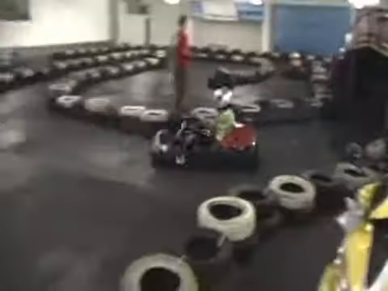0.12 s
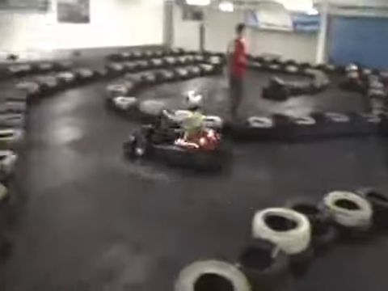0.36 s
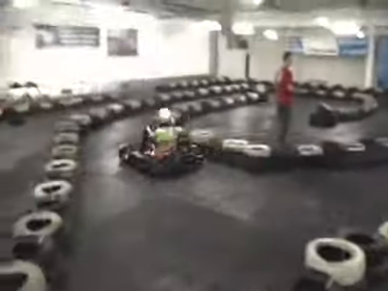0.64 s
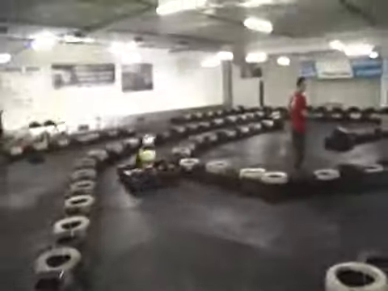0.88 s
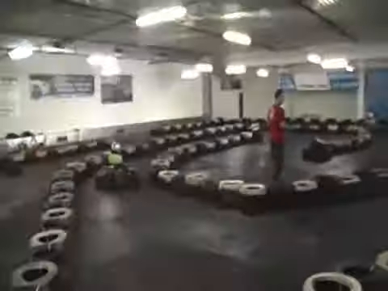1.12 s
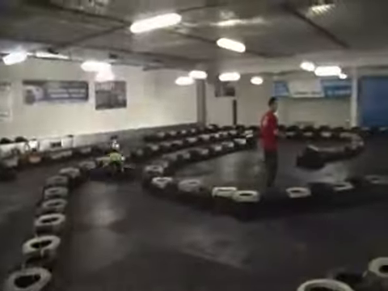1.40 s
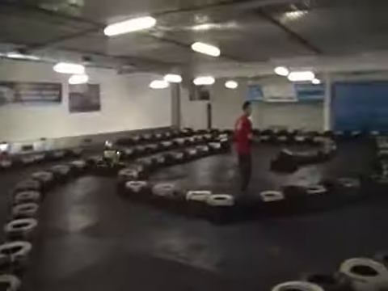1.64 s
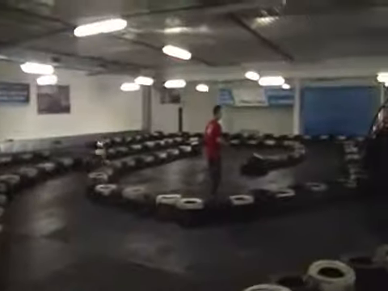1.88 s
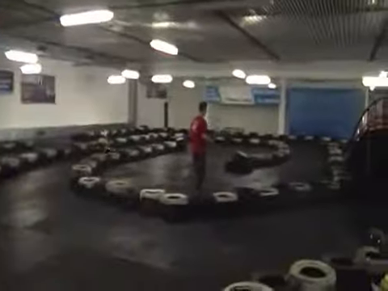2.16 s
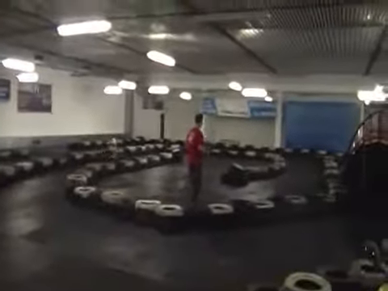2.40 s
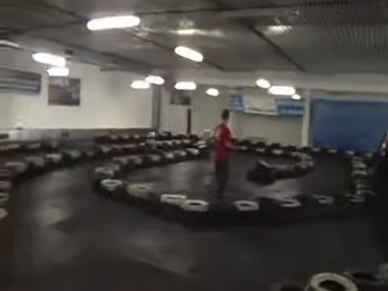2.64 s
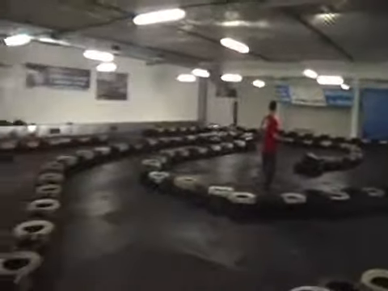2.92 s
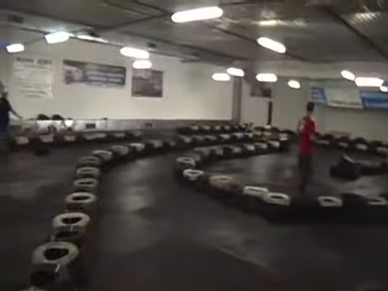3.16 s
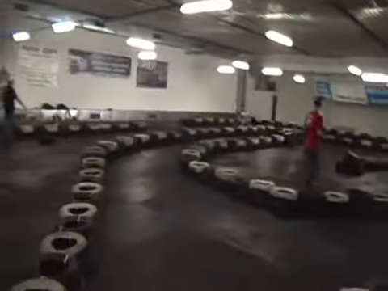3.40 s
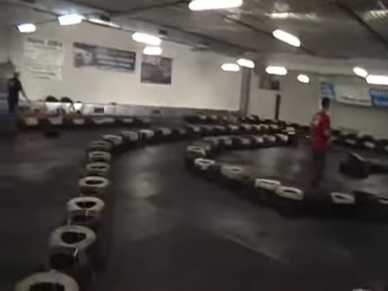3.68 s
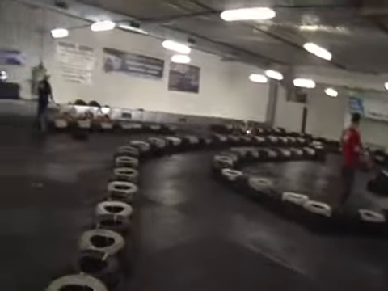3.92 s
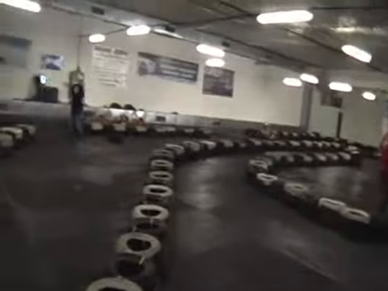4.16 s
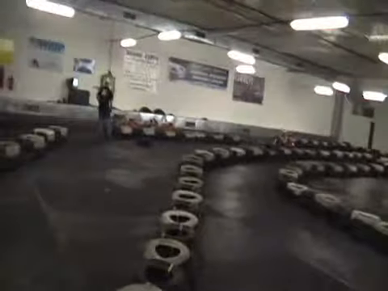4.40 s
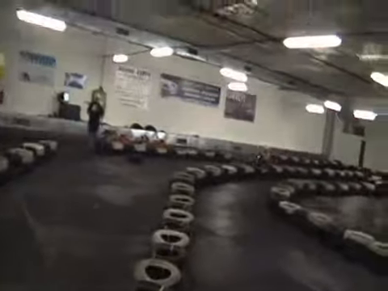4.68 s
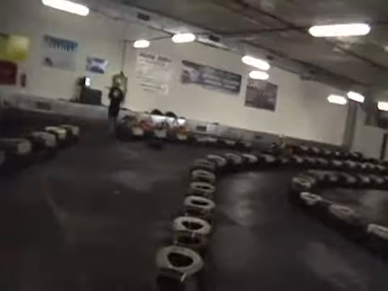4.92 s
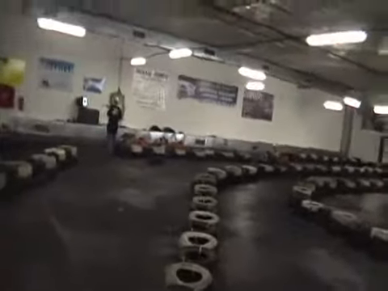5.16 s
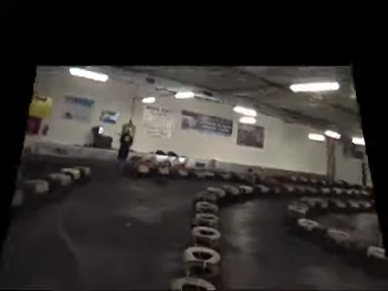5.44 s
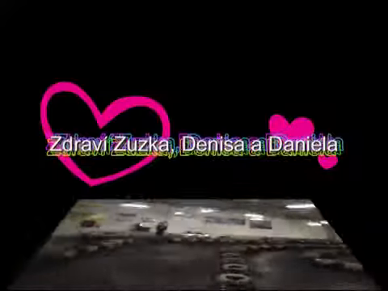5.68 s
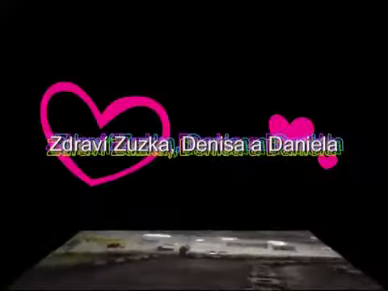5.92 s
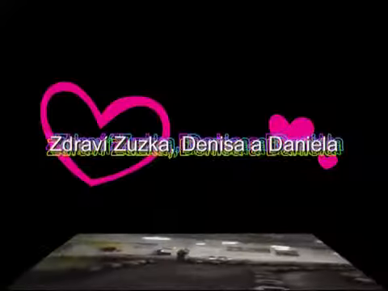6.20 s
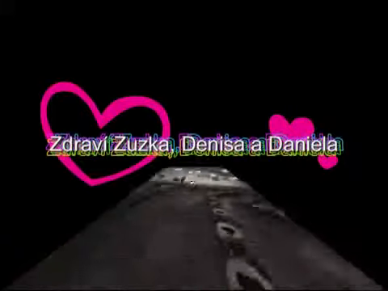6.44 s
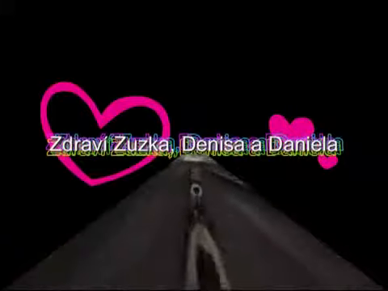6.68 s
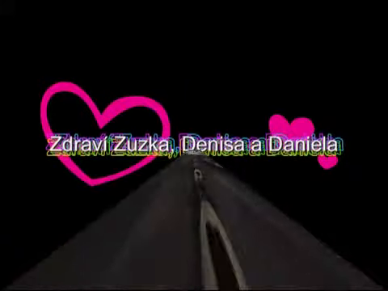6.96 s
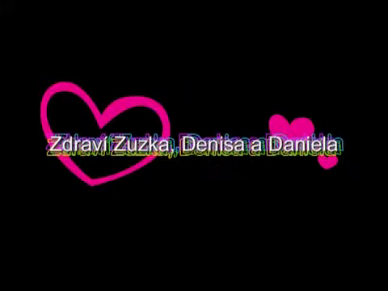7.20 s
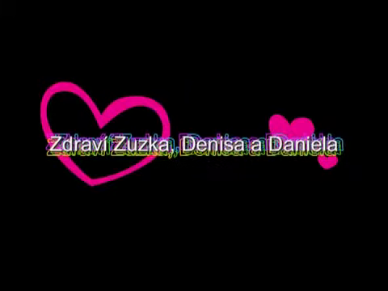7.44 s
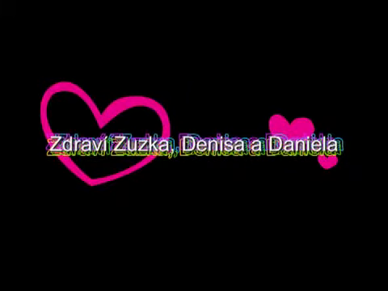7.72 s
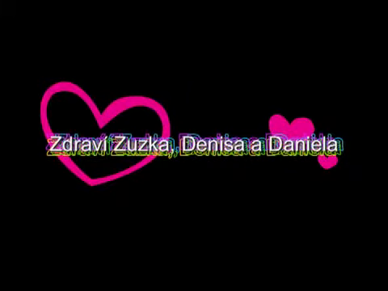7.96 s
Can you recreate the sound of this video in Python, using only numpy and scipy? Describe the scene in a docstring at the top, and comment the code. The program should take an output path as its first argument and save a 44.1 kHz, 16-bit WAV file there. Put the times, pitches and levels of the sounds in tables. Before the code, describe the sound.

A continuous noisy roar of kart engines fills an indoor track: low exhaust rumble, metallic rattle and rough hiss, pulsing with rapid firing. Low buzzing notes from different karts stand out in turn. Midway the tyres screech in wavering tones, while the engine roar dips and then returns. A straight fade carries it all away, with one last faint squeal, in a slightly wide, trackside stereo pickup.

```python
"""First comes a dense roar in a low concrete hall, with the exhaust notes of lapping karts standing out of it.
The roar is shaped noise and the single-cylinder four-stroke notes are combs of firing orders.
From 3.2 s tyres squeal through the corners: unsteady stick-slip tones with a tail of the hall.
Two close microphone ports take it all in; a straight fade ends in silence."""
import sys
import numpy as np
from scipy import signal
from scipy.fft import rfft, irfft
from scipy.io import wavfile
from scipy.ndimage import uniform_filter1d

SR = 44100
rng = np.random.default_rng(int(sys.argv[2]) if len(sys.argv) > 2 else 0)


def level_to_linear(level):
    """Convert decibel levels to linear amplitude factors, elementwise."""
    exponent = np.asarray(level, float) / 20
    return 10 ** exponent


def unload_audio(sound):
    """Save the sound as a 16-bit wav file, at the path given as the first command line argument."""
    columns = np.transpose(np.atleast_2d(sound))
    # keep every value between -1 and 1, then stretch to whole-number steps
    steps = np.round(np.clip(columns, -1, 1) * 32767)
    wavfile.write(sys.argv[1], SR, steps.astype(np.int16))


N = 356315
T = np.arange(N) / SR  # s


def evened(x):
    """Scales a signal to rms 1."""
    return x / np.sqrt(np.mean(x ** 2) + 1e-20)


def read(points, hz):
    """Reads a table over frequency at the given frequencies, on a logarithmic scale of pitch."""
    f, value = np.transpose(points)
    return np.interp(np.log(hz + 1), np.log(f + 1), value)


def columns(rows, t):
    """Reads every column of a table over time at the times t."""
    s, *values = np.transpose(rows)
    return [np.interp(t, s, v) for v in values]


def hump(x, middle, length):
    """A smooth rise and fall of height 1."""
    return np.exp(-4 * ((x - middle) / length) ** 2)


def wander(count, hz):
    """Smooth chance of rms 1 that changes up to about hz times a second."""
    b, a = signal.butter(2, min(hz, 9000), fs=SR)
    return evened(signal.lfilter(b, a, rng.standard_normal(count)))


def coloured(points, patchy_db):
    """Noise of a given spectrum with drifting louder and softer patches, at rms 1."""
    hz = np.fft.rfftfreq(2048, 1 / SR)
    real, imaginary, chance = rng.standard_normal((N // 512 + 5, 1025, 3)).T
    smooth = uniform_filter1d(chance, size=16, axis=0)  # over frequency
    patches = evened(uniform_filter1d(smooth, size=8, axis=1))  # over time
    outside = (hz < points[0][0]) | (hz > points[-1][0])
    shape_db = np.where(outside, -120, read(points, hz))
    spectra = (real + 1j * imaginary) * level_to_linear(shape_db[:, None] + patchy_db * patches)
    return evened(signal.istft(spectra, nperseg=2048, noverlap=1536)[1][:N])


def ringing(modes):
    """Noise ringing in a few resonances."""
    sound = 0
    for hz, width, db in modes:
        b, a = signal.iirpeak(hz, hz / width, SR)
        sound = sound + level_to_linear(db) * evened(signal.lfilter(b, a, rng.standard_normal(N)))
    return sound


# low exhaust rumble across the hall: (frequency [Hz], relative density [dB per Hz])
RUMBLE_SPECTRUM = [(15, -40.5), (25, -10.5), (70, -10), (110, -6.5), (214, -1.5), (353, -7), (415, -1.5),
                   (604, -7.5), (834, -5.5), (1350, -14.5), (1800, -16), (2340, -49), (3960, -120)]


def rumble(level_db):
    """Many exhausts smeared by the hall into low, patchy noise."""
    return level_to_linear(level_db) * coloured(RUMBLE_SPECTRUM, patchy_db=1.4)


# engine clatter across the hall: (frequency [Hz], relative density [dB per Hz])
CLATTER_SPECTRUM = [(530, -5.5), (900, -2.5), (1370, -4), (2300, -2), (2650, -3), (3130, -3), (6000, -10),
                    (7800, -32.5), (13200, -120)]
# a casing that rings in the clatter: (frequency [Hz], width [Hz], level over the clatter [dB])
CASING_MODES = [(2642, 110, -10)]
# silencer of the nearest kart: (frequency [Hz], width [Hz], relative level [dB])
SILENCER_MODES = [(581.5, 52, 0), (1128, 33, -4)]
# that silencer rings out: (middle [s], length [s], level [dB])
SILENCER_SWELLS = [(.7, 1.0, -25.5), (1.6, 0.74, -25), (3.85, 0.91, -28), (5.2, 0.32, -31)]


def clatter(level_db, puff):
    """Casings and chains as noise, with the silencer's resonances; the firings puff through both."""
    engines = level_to_linear(level_db) * (coloured(CLATTER_SPECTRUM, patchy_db=0.63) + ringing(CASING_MODES))
    silencer_level = sum(level_to_linear(db) * hump(T, middle, length) for middle, length, db in SILENCER_SWELLS)
    return (engines + silencer_level * ringing(SILENCER_MODES)) * evened(1 + 0.51 * puff)


# main part of the hiss: (frequency [Hz], relative density [dB per Hz])
HISS_SPECTRUM = [(2350, -25), (4000, -7), (5100, -0.5), (6750, -1.5), (9000, -10), (9800, -33.5),
                 (12000, -62)]
# part of the hiss that lies mostly above 9 kHz: (frequency [Hz], relative density [dB per Hz])
HIGH_HISS_SPECTRUM = [(8500, -14), (9300, 3), (10600, 0.5), (11800, -16.5), (12200, -30.5)]


def hiss(level_db, high_db, puff):
    """Treble noise with a separate part above 9 kHz, both swelling at every firing puff."""
    body = level_to_linear(level_db) * coloured(HISS_SPECTRUM, patchy_db=1.3)
    high = level_to_linear(high_db) * coloured(HIGH_HISS_SPECTRUM, patchy_db=3.0)
    return (body + high) * evened(1 + puff)


# roar in the hall:
# (time [s], exhaust rumble [dB], engine clatter [dB], hiss [dB], level of the hiss above 9 kHz [dB])
ROAR_LEVELS = [(0, -18, -19.5, -25, -44), (.42, -19, -18.5, -22, -35.5), (.9, -21.5, -20.5, -23, -36.5),
               (.97, -22, -21, -27, -48.5), (1.3, -18, -18.5, -24.5, -44.5), (1.37, -19, -16.5, -21, -33),
               (1.55, -19.5, -19.5, -22.5, -38.5), (1.77, -17, -17.5, -20.5, -35.5),
               (1.86, -20, -20.5, -25, -46.5), (2.4, -18.5, -19.5, -23, -37.5), (2.7, -20, -20, -25, -39),
               (3.3, -18, -19.5, -23.5, -39.5), (3.6, -19, -21.5, -26, -65), (4.05, -22, -17, -28, -61.5),
               (4.21, -25, -23, -23, -62), (4.57, -26, -26.5, -32.5, -69), (4.83, -23.5, -27, -33, -55.5),
               (5.1, -21, -20, -26, -49), (5.43, -17.5, -19.5, -26, -50), (6.1, -17, -18.5, -24.5, -44.5),
               (6.6, -19.5, -19.5, -22.5, -41), (7.3, -20, -19.5, -25.5, -36.5)]
# firing puffs of the nearest kart: (time [s], depth in the hiss before evening [share])
PUFF_DEPTH = [(0, 0.63), (1.8, 0.23), (2.2, 0.16), (7, 0.24)]


def roar(turns):
    """Rumble, clatter and hiss together; the nearest kart's firings puff through the clatter and hiss."""
    rumble_db, clatter_db, hiss_db, high_hiss_db = columns(ROAR_LEVELS, T)
    depth, = columns(PUFF_DEPTH, T)
    puff = depth * np.exp(-(turns % 1) / 0.2)  # dies away over a fifth of the firing interval
    flicker = level_to_linear(0.5 * wander(N, hz=14))  # the whole roar flickers by 0.5 dB rms
    return flicker * (rumble(rumble_db) + clatter(clatter_db, puff) + hiss(hiss_db, high_hiss_db, puff))


def hall(x, t60):
    """A dense tail of noise, from 15 ms on, that falls 60 dB in t60 seconds."""
    t = np.arange(SR) / SR
    tail = rng.standard_normal(SR) * level_to_linear(-60 * t / t60) * (t > .015)
    return signal.fftconvolve(x, tail / np.linalg.norm(tail))[:N]


# one table for each squeal: (time [s], slip rate [Hz], level before overtones and band filter [dB],
# overtones over that level [dB], unsteadiness of the rate [share, rms])
TYRE_SQUEALS = [
    [(3.2, 3175, -28.5, -15.5, 0.098), (3.3, 3210, -21.5, -14, .12), (3.5, 3160, -22.5, -21, .14),
     (3.72, 2767, -22, -4, 0.14), (3.87, 2624, -21, -5, 0.092), (4.03, 2890, -21, 1, 0.085),
     (4.1, 2823, -21, -3.5, 0.063), (4.17, 2800, -28.5, -4, .07)],
    [(4.05, 2150, -33, -6.5, .044), (4.09, 2163, -17, -9.5, .045), (4.145, 2180, -16.5, -3, 0.055),
     (4.21, 2070, -17.5, -3, .05), (4.39, 1950, -13, -6, .075), (4.47, 2002, -16.5, -4.5, .08),
     (4.59, 2027, -15, -6.5, 0.098), (4.63, 2060, -17, -9.5, .12), (4.75, 2015, -18.5, -7, .12),
     (4.95, 2063, -20.5, -9, .12), (5.05, 2064, -26, -13, .12), (5.22, 2017, -21.5, -12.5, .12),
     (5.4, 2010, -30, -8.5, .1)],
    [(4.6, 3150, -25.5, -30.5, .053), (5, 3090, -30.5, -26, 0.062)],
    [(6.5, 2600, -30, -3, .04), (6.57, 2740, -21.5, -4, .03), (6.63, 2560, -21.5, -5, .05),
     (6.71, 2610, -22, -8, .045), (6.73, 2280, -21.5, -5, .03), (6.85, 2400, -24, -13, .06),
     (6.89, 2484, -29, -8, 0.066), (7, 2450, -22.5, -17, 0.06), (7.05, 2430, -24, -9, .047)],
]


def squeal(rows):
    """Tread blocks stick and slip in bursts of a few ms, each at its own unsteady rate, with overtones."""
    t = np.arange(rows[0][0], rows[-1][0], 1 / SR)
    hz, level_db, overtone_db, unsteady = columns(rows, t)
    sound = np.zeros(len(t))
    for block in range(6):
        slip_hz = hz * (1 + unsteady * wander(len(t), hz=219.2))
        phase = 2 * np.pi * np.cumsum(slip_hz) / SR
        burst = wander(len(t), hz=168.2)
        overtones = level_to_linear(overtone_db) * (np.cos(2 * phase) + .6 * np.cos(3 * phase))
        sound += burst * np.cos(phase) + abs(burst) * overtones
    # the tread radiates a band
    band = signal.butter(3, [1600, 7500], "band", fs=SR, output="sos")
    sound = signal.sosfilt(band, sound) / np.sqrt(3)  # six blocks of rms 1/sqrt(2) add up to sqrt(3)
    out = np.zeros(N)
    start = round(t[0] * SR)
    out[start:start + len(t)] = level_to_linear(level_db) * sound * signal.windows.tukey(len(t), .06)
    return out


def turns_of(rows):
    """Counts firings from the start, at a slightly uneven rate."""
    rate = columns(rows, T)[0]
    return np.cumsum(rate * (1 + 0.0019 * wander(N, hz=5.3))) / SR


# one table for each stretch in which a kart's note stands out: (time [s], firing rate [per s], throb at twice
# the firing rate [dB], base level of the exhaust note [dB])
KART_STRETCHES = [
    [(0, 22.08, -37, -39), (.6, 21.9, -38, -31), (1.1, 21.9, -46, -40), (1.6, 21.9, -37.5, -31),
     (2, 22.05, -49.5, -46), (3, 21.5, -53.5, -46), (3.3, 21.5, -47, -34), (3.99, 21.92, -29, -32.5),
     (4.2, 22.1, -38.5, -36.5), (4.6, 21.72, -42, -42.5), (5.1, 21.98, -34, -33), (5.7, 22.2, -41.5, -36),
     (6.3, 22.05, -36, -39.5), (6.9, 21.8, -41, -30.5), (7.3, 21.87, -40.5, -34)],
    [(.2, 26.66, -38, -34.5), (.5, 26.68, -30.5, -36.5), (.9, 26.63, -40.5, -40), (1.3, 26.64, -50.5, -41),
     (1.8, 26.5, -43, -39.5), (2.1, 26.72, -33.5, -29.5), (2.44, 26.42, -29, -30),
     (2.84, 26.05, -29.5, -26.5), (3.2, 26.3, -47, -29), (3.5, 26.38, -46.5, -36.5)],
    [(5, 26.56, -47, -33.5), (5.44, 26.57, -46, -33), (5.8, 26.4, -28, -33.5), (6.24, 26.35, -40.5, -33.5),
     (6.63, 26.46, -28, -33.5), (7.2, 26.7, -28, -33.5)],
    [(.5, 23.85, -36.5, -33.5), (.75, 23.62, -43.5, -36.5), (1.4, 23.58, -38, -37), (1.7, 23.53, -40, -36)],
    [(1.3, 29.48, -41, -46), (1.6, 29.42, -49.5, -39), (1.9, 29.01, -43, -31)],
    [(5.74, 30.49, -43.5, -32.5), (6.14, 30.28, -31.5, -33)],
]
# colour of the exhaust orders: (frequency [Hz], level over the base [dB])
EXHAUST_COLOUR = [(60, -24), (85, -4.5), (110, -4), (132, -1), (160, -6.5), (210, 0), (270, -2),
                  (350, -3.5), (480, -9), (700, -12)]
# an exhaust order swells while a kart passes a spot where the hall favours its pitch:
# (middle [s], length [s], frequency [Hz], lift [dB])
HALL_SWELLS = [(.4, .5, 132, 7), (.6, .35, 198, 11), (.9, .4, 187, 6), (1.3, .6, 118, 10),
               (1.42, .3, 175, 11), (1.65, .3, 307, 4), (1.75, .3, 147, 11), (1.7, .5, 88, 8),
               (1.9, .35, 233, 8), (2.25, .6, 240, 11), (2.35, .55, 293, 12), (2.6, .45, 184, 9),
               (2.65, .4, 262, 4), (2.85, .5, 157, 5), (2.05, .4, 400, 8), (2.8, .25, 366, 8),
               (2.88, .4, 209, 10), (3.3, .35, 210, 10), (3.15, .5, 131, 2), (3.6, .3, 109, 8),
               (3.88, .45, 175, 10), (3.95, .3, 198, 8), (4.6, .7, 131, 7), (5.25, .4, 133, 8),
               (5.25, .4, 110, 4), (5.47, .3, 266, 15), (5.5, .5, 186, 6), (5.8, .45, 211, 8),
               (5.9, .4, 178, 12), (6.15, .3, 121, 8), (6.9, .9, 240, 6), (6.8, .9, 107, 6)]


def kart(rows, turns):
    """One firing every two crank turns: a comb of orders, each wavering as the kart crosses the hall's modes."""
    first, last = rows[0][0], rows[-1][0]
    span = slice(max(round((first - .1) * SR), 0), round((last + 0.086) * SR))
    t, turns = T[span], turns[span]
    slow = t[::512]  # levels are worked out every 512 samples
    rate, throb_db, note_db = columns(rows, slow)
    sound = np.interp(t, slow, level_to_linear(throb_db)) * np.cos(4 * np.pi * turns)  # twice each firing
    for order in range(3, 26):
        hz = order * rate
        lift_db = 0
        for middle, length, favoured_hz, db in HALL_SWELLS:
            lift_db = lift_db + db * hump(slow, middle, length) * hump(hz, favoured_hz, 13)  # 13 Hz wide
        waver_db = np.interp(slow, np.linspace(0, T[-1], num=36), 1.8 * rng.standard_normal(36))
        level = level_to_linear(note_db + read(EXHAUST_COLOUR, hz) + lift_db + waver_db)
        sound += np.interp(t, slow, level) * np.cos(2 * np.pi * (order * turns + rng.random()))
    # the last 16 ms ease down to 0.88
    edge = np.clip(np.minimum(t - first + 0.25, last + .2 - t) / 0.13, 0, 1)
    out = np.zeros(N)
    out[span] = np.sqrt(2) * sound * edge  # table levels are rms
    return out


# likeness of the two ports: (frequency [Hz], left-right correlation [-1 to 1])
PORT_LIKENESS = [(60, 1), (340, 0.99), (820, 0.96), (1970, .89), (4720, 0.79), (6500, 0.55), (8500, -0.033),
                 (11300, -0.38)]
# steady lean of the pair, before the offset and the passes: (frequency [Hz], left over right [dB])
PORT_LEAN = [(60, 3), (140, 1.5), (340, 2.5), (820, 2), (1970, 2), (4720, 2.5), (11300, -2)]
# a kart passes on the left: (middle [s], length [s], push of left over right [dB])
LEFT_PASSES = [(.98, 0.5, 1.7), (2.3, 0.73, 3.5), (3.2, .35, 2), (3.8, .4, 1.5), (5.15, 0.83, 3)]


def microphones(x):
    """Two close ports: alike in the bass, ever more a differently scattered copy in the treble."""
    t = np.arange(SR // 2) / SR
    scatter = rng.standard_normal(len(t)) * level_to_linear(-60 * t / .5)
    scattered = signal.oaconvolve(x, scatter / np.linalg.norm(scatter))[:N]
    hz = np.fft.rfftfreq(N, 1 / SR)
    angle = np.arccos(np.clip(read(PORT_LIKENESS, hz), -1, 1)) / 2
    mid, side = rfft(x) * np.cos(angle), rfft(scattered) * np.sin(angle)
    lean = level_to_linear(read(PORT_LEAN, hz) / 2)
    pair = irfft([(mid + side) * lean, (mid - side) / lean], N)
    push_db = sum(db * hump(T, middle, length) for middle, length, db in LEFT_PASSES)
    pan = level_to_linear((push_db - 2.2) / 2)  # 2.2 dB offsets most of the steady left lean between passes
    return pair * [pan, 1 / pan]


def scene():
    """The roar, the tyres with their tail in the hall, and the karts, at the microphones."""
    turns = [turns_of(rows) for rows in KART_STRETCHES]
    background = roar(turns[0])
    tyres = sum(squeal(rows) for rows in TYRE_SQUEALS)
    tyre_tail = level_to_linear(-7) * hall(tyres, t60=.6)
    engines = sum(kart(rows, count) for rows, count in zip(KART_STRETCHES, turns))
    return microphones(background + tyres + tyre_tail + engines)


# straight ramp to silence: (start [s], end [s])
FADE_OUT = (5.46, 7.398)


def low_pass(x):
    """Removes everything above the highest recorded frequency."""
    return signal.sosfilt(signal.butter(12, 11910, fs=SR, output="sos"), x)


def record(dry):
    """Fades the microphone pair to silence, then rounds its peaks by soft clipping."""
    start, end = FADE_OUT
    faded = dry * np.clip((end - T) / (end - start), 0, 1)
    finished = 1.45 * np.tanh(faded / 1.472)
    return low_pass(finished)


dry = scene()
out = record(dry)
unload_audio(out)
```